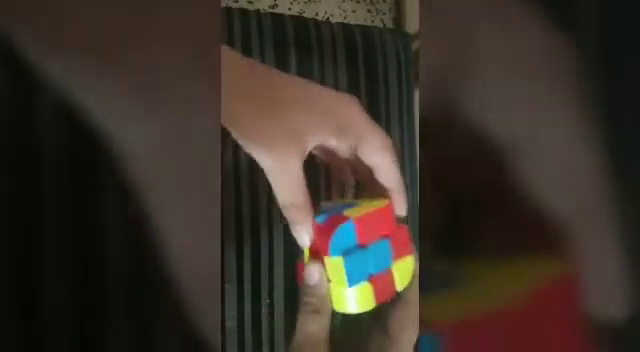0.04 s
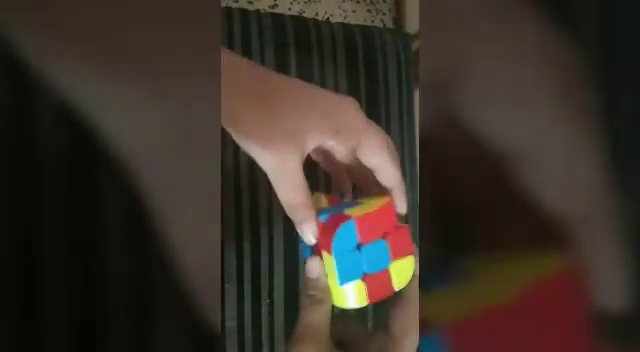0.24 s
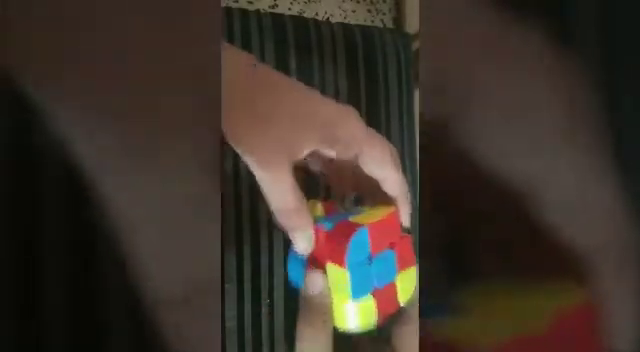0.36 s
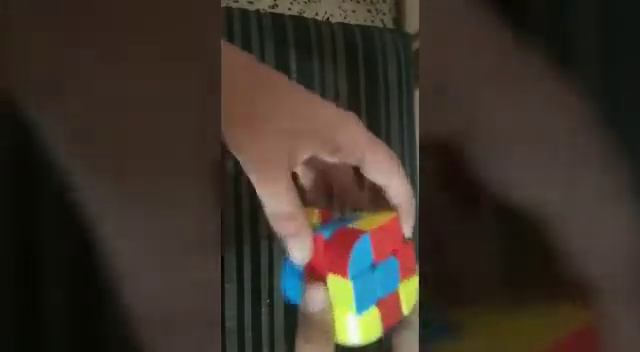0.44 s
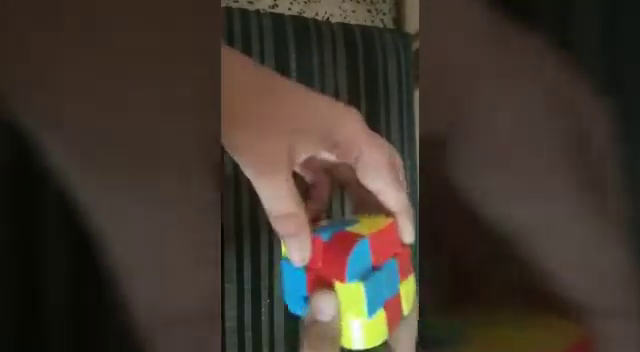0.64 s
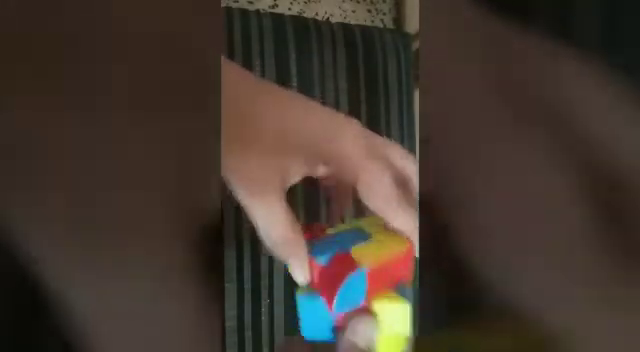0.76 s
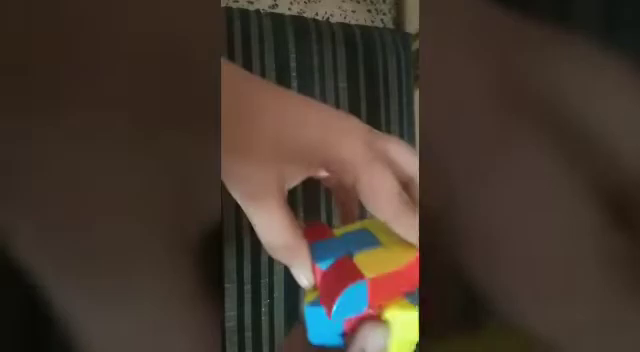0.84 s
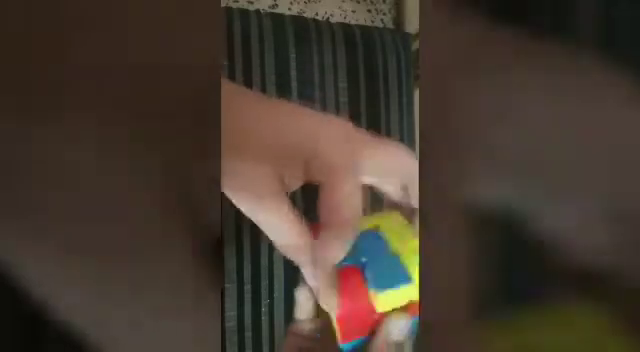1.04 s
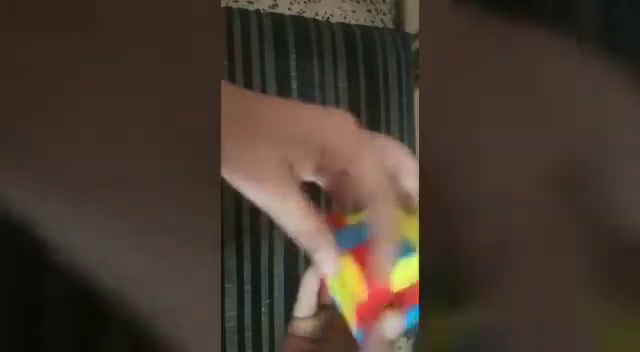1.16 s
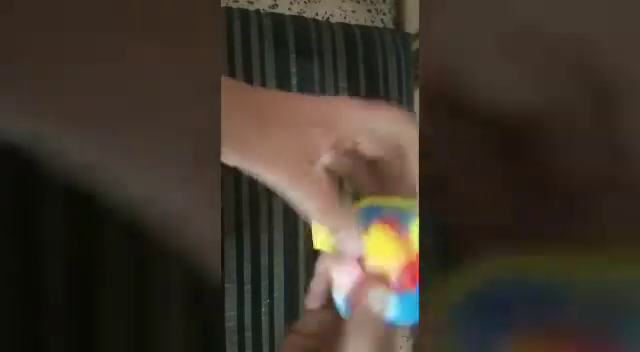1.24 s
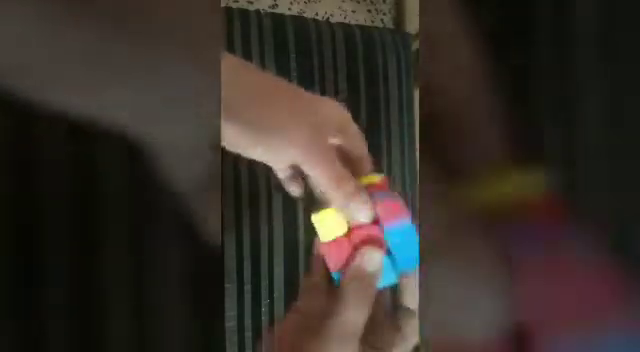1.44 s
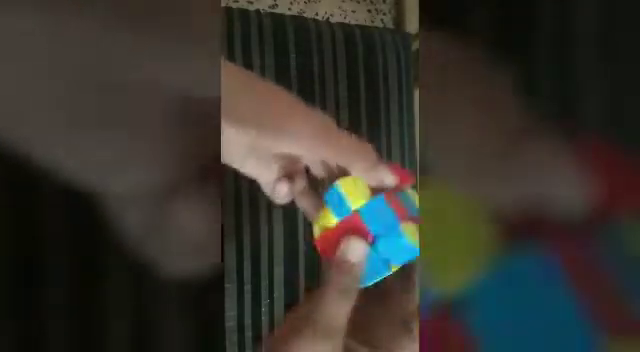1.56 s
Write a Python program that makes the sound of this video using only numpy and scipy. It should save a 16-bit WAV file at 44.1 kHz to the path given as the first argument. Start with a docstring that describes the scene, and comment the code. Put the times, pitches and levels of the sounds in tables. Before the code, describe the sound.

A plastic puzzle cube is turned by hand, close to the microphone in a small quiet room. Faint ticks lead to a loud, bright cluster of clacks at 0.2-0.26 s with a slight hollow thud. Soft clicks and light sliding follow until a second sharp rasping snap at 1.07-1.1 s. Lighter clicks continue from 1.28 s, with a tiny squeak near 1.39 s, to the end at about 1.6 s.

```python
"""Twisting a plastic puzzle cube

A plastic puzzle cube is twisted by hand, close to the listener in a small room. Each contact mixes
filtered noise bursts with short ringing tones: a bright snap of edges over a knock of hollow shells.
The sliding layers rasp as a stream of tiny filtered pulses, and a tight piece squeaks as short wavering tones.
The hands bump as soft low tones, seating layers thud as a few fading tones, and the room is shaped noise.
"""
import sys
import numpy as np
from scipy import signal
from scipy.fft import rfft, irfft, next_fast_len
from scipy.io import wavfile
from scipy.ndimage import uniform_filter1d

SR = 44100
rng = np.random.default_rng(int(sys.argv[2]) if len(sys.argv) > 2 else 0)


def inscribe(sig):
    """Save sig as 16-bit PCM at rate SR to the path in sys.argv[1].

    A 1-D sig is mono; a 2-D sig holds one channel per row.
    Samples are clipped to [-1, 1] before scaling.
    """
    pcm = np.round(np.clip(np.atleast_2d(sig).T, -1, 1) * 32767)
    wavfile.write(sys.argv[1], SR, pcm.astype(np.int16))


N = 70560  # length in samples (1.6 s)

# Quiet rumble and hiss of the room, tone balance: f/Hz, level/dB
ROOM_NOISE_COLOUR = [(25, -15), (60, 6), (115, 7), (200, 3.5), (450, 3), (1600, -10), (3000, -9),
                     (4600, -8), (7300, -11.5), (9500, -53), (12000, -22), (15000, -28)]
ROOM_NOISE_DB = -63  # average (rms) level

# Strength of the rasp over time, before its filters: t/s, level/dB
SLIDE_LEVELS = [(0, -72.5), (.17, -64.5), (.21, -51), (.27, -46.5), (.35, -55), (.47, -79), (.52, -65),
                (.6, -72), (.68, -51), (.76, -88), (0.804, -45), (0.839, -61), (.93, -59), (1.044, -56),
                (1.07, -40), (1.085, -24.5), (1.103, -51), (1.125, -74), (1.239, -57), (1.298, -47),
                (1.375, -52.5), (1.431, -44), (1.465, -70), (1.49, -49), (1.518, -56.5), (1.576, -46),
                (1.6, -50)]
# Bright side of the tiny slips: f/Hz, level/dB
RASP_COLOUR = [(300, -70), (1500, -36), (3500, -15), (4700, -10), (6200, -4), (7400, 0), (8100, -4),
               (9000, -16), (10500, -27), (12000, -48), (15500, -52)]
# The cube's hollow inside, heard under the sliding: f/Hz, level/dB
HOLLOW_COLOUR = [(100, -45), (300, -38), (520, -20), (700, -4), (820, 1), (1050, -7), (1350, -2),
                 (1800, -4), (2300, -2), (3200, -6), (4500, -8), (9000, -38)]
SLIPS_PER_S, SLIP_SPREAD_DB, HOLLOW_DB = 2200, 4, -7  # average rate, random loudness, hollow part

# Contacts between pieces, before CUBE_DB: t/s, snap level/dB, knock level/dB, edge f/Hz, shell f/Hz
CONTACTS = [(.027,-44,-52,7100,1280), (0.066,-55.5,-58.5,7240,1400), (0.094,-52.5,-49,6460,2380),
            (0.1128,-61,-55,7410,2340), (.124,-49.5,-40.5,7400,2040), (.1475,-51.5,-66,6240,840),
            (.173,-44,-71,6970,1010), (0.1896,-40,-50,6600,1380), (0.1988,-38,-39,6700,1680),
            (.2016,-20.5,-33,7030,1840), (0.2027,-24,-32,8140,3240), (.214,-31.5,-38.5,7600,3380),
            (0.2216,-16,-44,7410,3160), (0.2226,-23,-25,7660,1930), (0.2239,-19,-25,7160,3320),
            (0.2267,-31,-42,6300,3170), (0.2351,-25.5,-34,6720,2800), (0.2467,-28,-29.5,6670,2600),
            (0.2489,-12,-25,6500,2620), (.2513,-26,-31.5,7200,1700), (0.2579,-16.5,-33.5,7730,3620),
            (.276,-31,-40.5,7150,3350), (0.3576,-43,-50,7330,1370), (.377,-44.5,-48,7550,1340),
            (0.4164,-42,-48,6620,3570), (0.4535,-50.5,-57,7340,2580), (.4893,-35.5,-40.5,6370,2340),
            (.5349,-40,-45.5,7400,3030), (0.541,-40,-45,7670,3240), (0.5707,-52,-57,7300,1470),
            (0.611,-42,-49,6480,780), (.663,-44.5,-52,7400,1280), (.6805,-43,-46,6900,2250),
            (0.6871,-37,-43,5680,1980), (0.6904,-47,-43.5,7300,1890), (.707,-70,-48.5,6100,800),
            (0.732,-42.5,-45.5,6900,1950), (0.7363,-44.5,-54,7300,1900), (0.7731,-47.5,-49.5,6780,2470),
            (0.7912,-45,-53,6060,2410), (.798,-41,-42,6800,2410), (.8074,-40,-70,6840,2560),
            (.8488,-49.5,-46.5,7050,1480), (0.855,-54,-50.5,6900,1310), (0.9022,-48,-52.5,6530,1820),
            (.974,-42,-48.5,6960,2470), (0.9874,-47,-49,7240,2490), (0.991,-50,-46,5160,2550),
            (1.0242,-47,-78,7200,2190), (1.0287,-42.5,-47.5,7450,2240), (1.056,-42,-42,6900,915),
            (1.077,-29.5,-34.5,6900,800), (1.0813,-32,-36.5,7340,820), (1.0856,-24,-28,5830,1400),
            (1.088,-21,-37.5,7320,830), (1.0905,-28,-36,7800,3320), (1.0938,-25.5,-39,7490,2290),
            (1.0972,-29,-30.5,7300,2310), (1.1028,-23,-59,7040,2340), (1.1045,-20.5,-32,7650,2230),
            (1.108,-47,-47,7600,2380), (1.182,-42.5,-50,7300,3120), (1.2162,-50.5,-51,6740,780),
            (1.2785,-37,-39,7240,1950), (1.2934,-33,-42,6660,2390), (1.2996,-34,-41.5,7350,2380),
            (1.3038,-35,-47,4900,1360), (1.311,-39,-46.5,6400,3420), (1.3315,-43,-50,7300,2070),
            (1.35,-47,-45,7300,2300), (1.4163,-33,-31.5,6000,2130), (1.4213,-35,-48,7300,1700),
            (1.4365,-36.5,-42,6420,2220), (1.457,-37,-38,5500,3650), (1.4809,-39.5,-46,6120,3450),
            (1.5655,-60,-42,7000,2250), (1.5775,-36,-41,6770,2110)]
# Tone balance of the edge snap: f/Hz, level/dB
SNAP_COLOUR = [(300, -55), (2000, -38.5), (3500, -11), (4700, -5.5), (5400, -4.5), (6200, -2.5), (7200, 3),
               (8000, -3.5), (9000, -14), (10500, -21.5), (12000, -33.5), (15000, -33.5), (15800, -50)]
# Tone balance of the shell knock: f/Hz, level/dB
KNOCK_COLOUR = [(80, -36), (300, -24), (550, -15), (790, -6), (1050, -3), (1400, 0), (2200, 0), (3200, -2),
                (4500, -1), (7000, -14), (12000, -61)]
# Ringing tones of an edge: ratio to the edge pitch, level/dB, time to fade by 60 dB (t60)/s
EDGE_TONES = [(.82, -12, .009), (.92, -9, .008), (1, 0, .005), (1.08, -10, .008)]
# Ringing tones of a shell: ratio to the shell pitch, level/dB, t60/s
SHELL_TONES = [(1, 0, .012), (1.3, -7, .009), (1.7, -7, .009)]
SNAP_T60_S, KNOCK_T60_S = .011, .012  # fading time of the chatter
EDGE_RING_DB, SHELL_RING_DB, BLOW_DB = 1, -4, -1  # against the chatter
TONE_SPREAD_DB = 2.3  # random change of each ringing tone
RING_RISE_S = .0003
CLICK_S = .003  # a 0 dB click or thud has the energy of an rms of 1 held this long
CUBE_DB = -1.5  # applied to all contacts together

# Soft bumps of the hands: t/s, level/dB, f/Hz
BUMPS = [(0.056, -62, 138), (0.2475, -57, 114), (.288, -52, 85), (0.698, -51.5, 135), (0.722, -54.5, 106),
         (1.07, -61, 115), (1.284, -61, 64.7), (1.577, -60, 140)]
BUMP_T60_S, BUMP_ATTACK_S = .23, .0024
# Moments when a layer seats home: t/s, level/dB
THUDS = [(.2016, -45), (.2492, -38)]
# Tones of the whole cube in the hands: f/Hz, level/dB, t60/s
THUD_TONES = [(132, -5, 0.066), (277, 1, 0.021), (422, -8.5, 0.022), (568, 3.5, 0.025), (894, 9, 0.019)]

# Squeaks of a tight piece: t/s, level/dB, f/Hz, length/s
SQUEAKS = [(1.384, -33.5, 6820, 0.0052), (1.387, -38, 6340, 0.0089), (1.394, -55, 6350, .009)]
SQUEAK_WAVER = .01  # rms pitch wander, as a fraction of the pitch

# How long the room's tail takes to fade: f/Hz, t60/s
ROOM_T60 = [(200, 0.72), (1000, 0.17), (4000, .26), (7500, 0.18), (14000, 0.39)]
# Tone balance of the tail over the direct sound: f/Hz, level/dB
ROOM_COLOUR = [(100, -10), (450, -9), (800, -1), (1500, 0), (8000, 0), (10500, -2), (12500, -12)]
ROOM_DB, ROOM_BUILD_S = -9, .001
# Reflections off the hands and the nearest surfaces
EARLY_DB, EARLY_T60_S, EARLY_DELAY_S = -5.5, .013, .0011

TOP_HZ = 15800  # nothing is kept from here up


def amp(db):
    """Turn decibels into a gain."""
    return 10 ** (np.asarray(db) / 20)


def unit(x):
    """Scale to an average (rms) level of 1."""
    return x / np.sqrt(np.mean(x ** 2) + 1e-20)


def packet(x):
    """Scale to a total energy of 1."""
    return x / np.sqrt(np.sum(x ** 2) + 1e-20)


def along(points, hz):
    """Read a value between (Hz, value) points on a log pitch axis."""
    f, v = np.transpose(points)
    return np.interp(np.log(hz + 1), np.log(f + 1), v)


def add(track, s, x):
    """Mix x into the track at time s."""
    i = max(0, round(s * SR))
    track[i:i + len(x)] += x[:max(0, len(track) - i)]


def response(points, size=2048):
    """Make a short filter with the given tone balance, its energy packed at the start."""
    log_gain = np.log(amp(along(points, np.fft.rfftfreq(size, 1 / SR))))
    # Folding this log spectrum's transform forward in time gives a filter that only looks back
    folded = irfft(log_gain)
    folded[1:size // 2] *= 2
    folded[size // 2 + 1:] = 0
    return packet(irfft(np.exp(rfft(folded)))[:size // 2])


def through(x, h):
    """Filter x by the impulse response h."""
    return signal.fftconvolve(x, h)[:len(x)]


def in_room(x, size=16384):
    """Add near reflections and a fresh room tail: noise that fades at its own speed in each band."""
    hz, t, bands = signal.stft(rng.standard_normal(size), SR, nperseg=256)
    fade_db = along(ROOM_COLOUR, hz)[:, None] - 60 * t / along(ROOM_T60, hz)[:, None]
    tail = signal.istft(bands * amp(fade_db), SR)[1]
    age = np.arange(len(tail)) / SR
    tail = tail * (1 - np.exp(-age / ROOM_BUILD_S))
    early = rng.standard_normal(len(age)) * amp(-60 * age / EARLY_T60_S)
    early *= 1 - np.exp(-(age / EARLY_DELAY_S) ** 2)
    h = amp(ROOM_DB) * packet(tail) + amp(EARLY_DB) * packet(early)
    h[0] += 1  # the direct sound
    return signal.fftconvolve(x, h)


def room_noise():
    """Quiet rumble and hiss of the room: steady noise with a shaped spectrum."""
    spectrum = rfft(rng.standard_normal(N))
    gain = amp(along(ROOM_NOISE_COLOUR, np.fft.rfftfreq(N, 1 / SR)))
    return amp(ROOM_NOISE_DB) * unit(irfft(spectrum * gain, N))


def rasp():
    """Sliding layers catch in many tiny slips, which sound the same bright, hollow plastic."""
    happens = rng.random(N) < SLIPS_PER_S / SR
    strength = amp(SLIP_SPREAD_DB * np.clip(rng.standard_normal(N), -2, 2))
    slips = unit(happens * strength * rng.choice([-1, 1], N))
    slips = slips * amp(np.interp(np.arange(N) / SR, *np.transpose(SLIDE_LEVELS)))
    bright = through(slips, response(RASP_COLOUR))
    hollow = amp(HOLLOW_DB) * through(slips, response(HOLLOW_COLOUR))
    return in_room(bright + hollow)[:N]


def strike(colour, t60, hz, tones, ring_db, size=2048):
    """A sharp blow, the chatter of loose pieces after it, and the short ring of the struck piece."""
    t = np.arange(size) / SR
    chatter = packet(through(rng.standard_normal(size) * amp(-60 * t / t60), colour))
    ring = np.zeros(size)
    for ratio, db, life in tones:
        fade = amp(db + rng.normal(0, TONE_SPREAD_DB) - 60 * t / life)
        ring += fade * np.sin(2 * np.pi * (hz * ratio * t + rng.random()))
    ring = packet(ring * (1 - np.exp(-(t / RING_RISE_S) ** 2)))
    blow = np.pad(colour, (0, size - len(colour)))
    mix = amp(BLOW_DB) * blow + chatter + amp(ring_db) * ring
    return packet(mix) * np.sqrt(CLICK_S * SR)


def clicks():
    """Each contact snaps an edge and knocks a hollow shell; the pitches depend on the piece and the grip."""
    out, snap, knock = np.zeros(N), response(SNAP_COLOUR), response(KNOCK_COLOUR)
    for s, snap_db, knock_db, edge_hz, shell_hz in CONTACTS:
        edge = amp(snap_db) * strike(snap, SNAP_T60_S, edge_hz, EDGE_TONES, EDGE_RING_DB)
        shell = amp(knock_db) * strike(knock, KNOCK_T60_S, shell_hz, SHELL_TONES, SHELL_RING_DB)
        add(out, s, in_room(edge + shell))
    return amp(CUBE_DB) * out


def hand_bumps():
    """Soft bumps of the hands: low tones that swell quickly and fade."""
    out, t = np.zeros(N), np.arange(SR // 4) / SR
    for s, db, hz in BUMPS:
        envelope = amp(db - 60 * t / BUMP_T60_S) * (1 - np.exp(-t / BUMP_ATTACK_S))
        add(out, s, envelope * np.sin(2 * np.pi * hz * t))
    return out


def seating_thuds():
    """A layer seats home and the whole cube sounds in the hands as a few fading tones."""
    out, t = np.zeros(N), np.arange(SR // 4) / SR
    thud = np.zeros(len(t))
    for k, (hz, db, t60) in enumerate(THUD_TONES):
        sign = (-1) ** k  # every other tone starts downward
        thud += sign * amp(db - 60 * t / t60) * np.sin(2 * np.pi * hz * t)
    thud = packet(thud) * np.sqrt(CLICK_S * SR)
    for s, db in THUDS:
        add(out, s, in_room(amp(db) * thud))
    return out


def squeaks():
    """A tight piece sticks and slips in a tiny high chirp: a short tone of wavering pitch."""
    out = np.zeros(N)
    for s, db, hz, length in SQUEAKS:
        progress = np.arange(SR // 20) / SR / length  # 1 at the end of the squeak
        wander = unit(uniform_filter1d(rng.standard_normal(len(progress)), size=30))
        pitch = hz * (1 + SQUEAK_WAVER * wander)
        swell = np.sqrt(2 * np.abs(np.sin(np.pi * np.minimum(progress, 1))))
        tone = np.sin(2 * np.pi * np.cumsum(pitch) / SR)
        add(out, s, in_room(amp(db) * swell * tone))
    return out


def scene():
    """The cube and the hands over the quiet room, as one channel."""
    sliding = room_noise() + rasp() + squeaks()
    hands = hand_bumps() + seating_thuds()
    return (sliding + hands + clicks())[None]


def record(dry):
    """Cut off everything from the band limit up."""
    m = next_fast_len(N + SR // 2)  # spare room at the end keeps the filter from wrapping around
    keep = np.fft.rfftfreq(m, 1 / SR) < TOP_HZ
    return irfft(rfft(dry, m) * keep, m)[..., :N]


dry = scene()
out = record(dry)
inscribe(out)
```